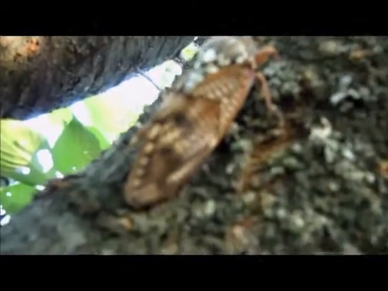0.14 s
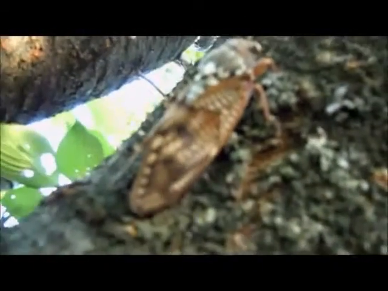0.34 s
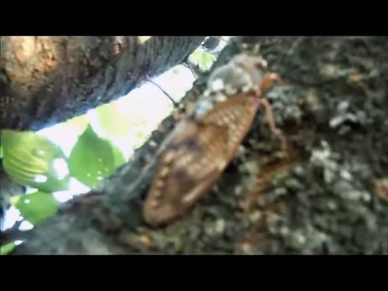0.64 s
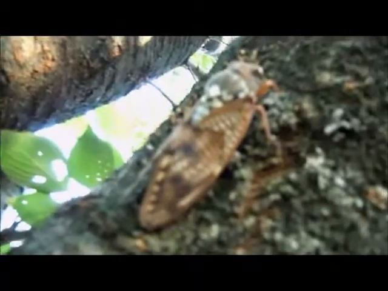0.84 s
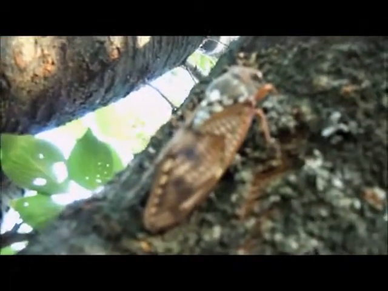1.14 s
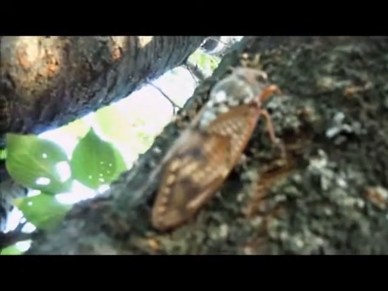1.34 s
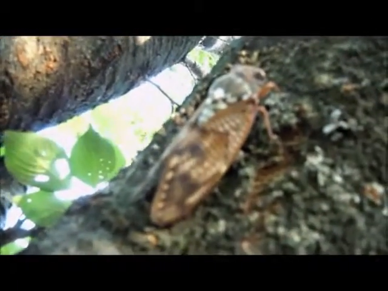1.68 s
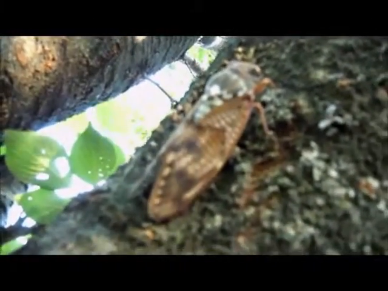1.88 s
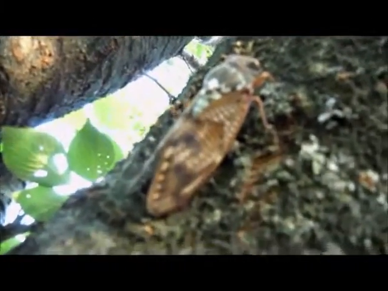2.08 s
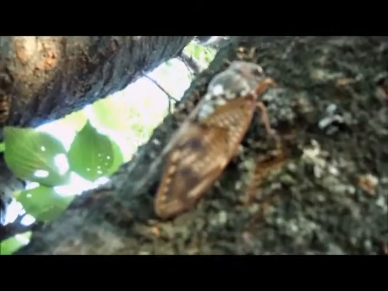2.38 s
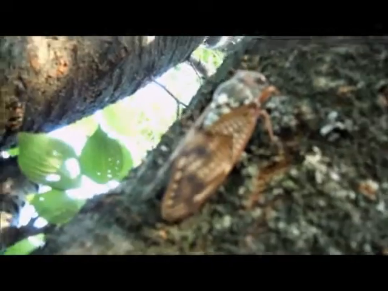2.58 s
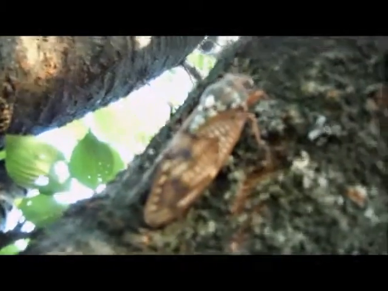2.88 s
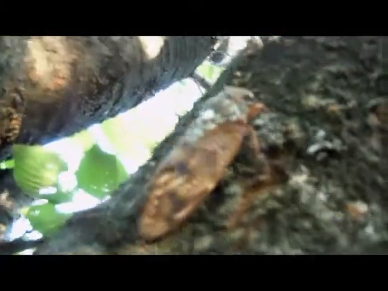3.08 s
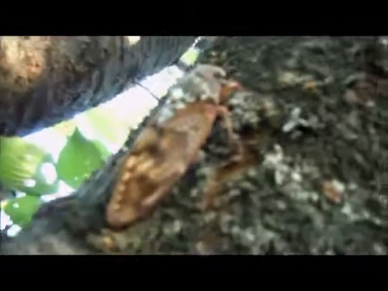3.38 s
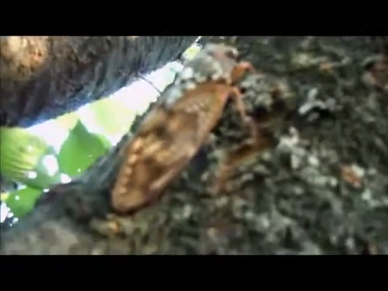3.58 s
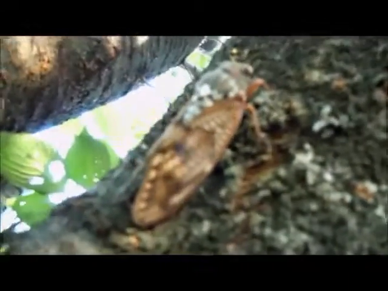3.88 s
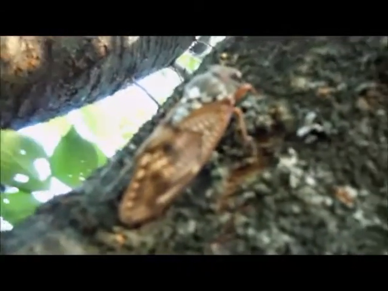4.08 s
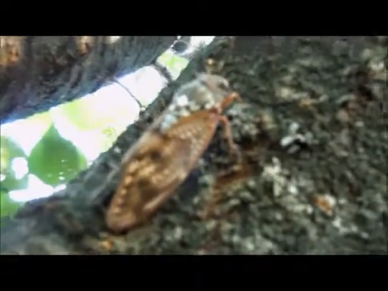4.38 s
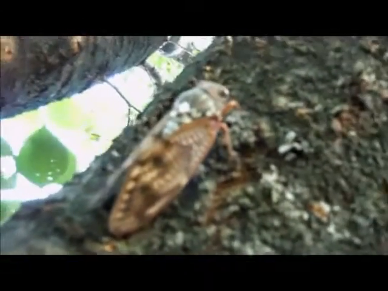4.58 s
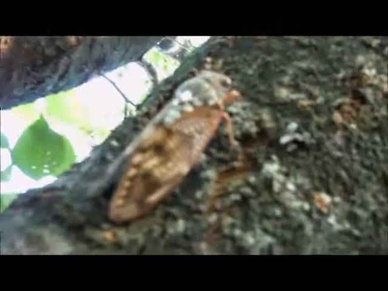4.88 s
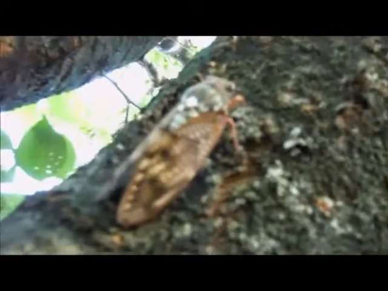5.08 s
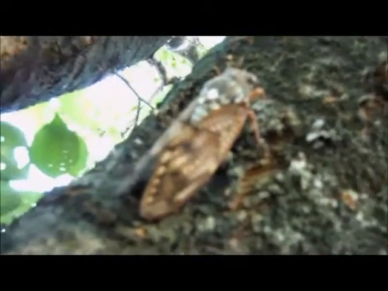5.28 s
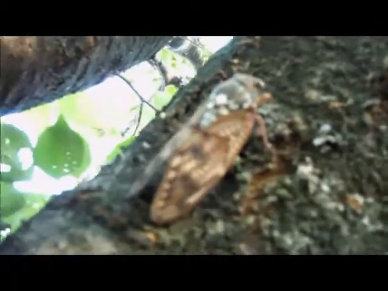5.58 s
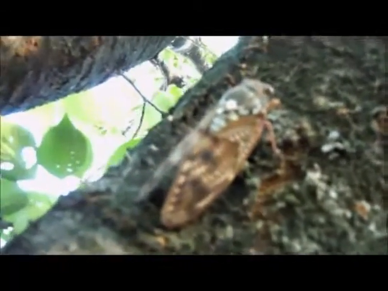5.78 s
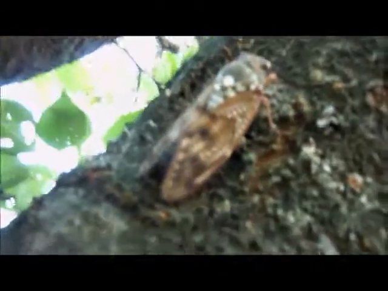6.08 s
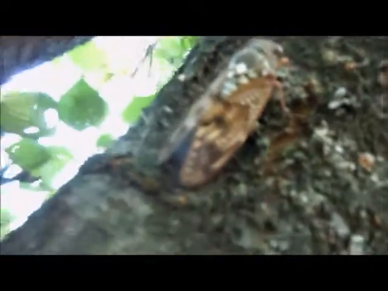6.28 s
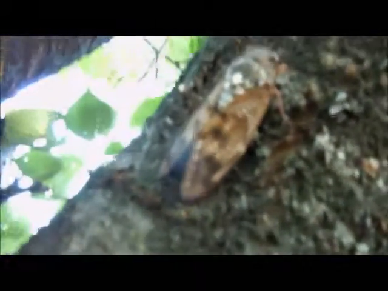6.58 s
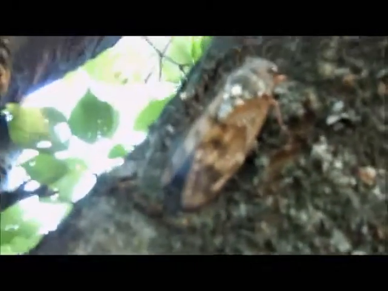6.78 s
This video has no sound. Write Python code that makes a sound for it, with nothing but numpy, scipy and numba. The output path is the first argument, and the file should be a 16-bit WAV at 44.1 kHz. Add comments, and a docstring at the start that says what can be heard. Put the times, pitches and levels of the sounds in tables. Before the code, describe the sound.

Outdoors among trees, a nearby cicada's raspy electric-sounding buzz dominates throughout, slightly towards the right. It drops in pitch and weakens, then suddenly turns brighter and stronger. Behind it are regular short rasping swells from a second cicada and a wide sizzling insect chorus. Soft road noise sits low underneath, with a few tiny casing ticks midway, a low vehicle hum later, and growing wind thumps on the microphone.

```python
"""A cicada on a tree trunk buzzes close to a small camera: click trains excite a body resonance that sinks,
then leaps up near 2.2 s and holds. From the start a neighbour swells twice a second over a chorus of
filtered random grains, a road murmurs as shaped noise, and low noise gusts as wind on the microphones.
Ringing casing ticks come near 2.9, 4.0 and 4.4 s; from 4.2 s an engine drones past as a sum of harmonics,
and the wind is strongest at the end."""
import sys
import numpy as np
from scipy import signal
from scipy.fft import rfft, irfft
from scipy.io import wavfile
from scipy.ndimage import uniform_filter1d
from numba import njit

SR = 44100
rng = np.random.default_rng(int(sys.argv[2]) if len(sys.argv) > 2 else 0)


def volts_from_db(level):
    """Convert decibel levels to linear amplitude ratios."""
    exponent = np.asarray(level, float) / 20
    return 10 ** exponent


def bounce(signal):
    """Save signal as a 16-bit WAV file at the path given by the first command-line argument."""
    frames = np.transpose(np.atleast_2d(signal))
    limited = np.clip(frames, -1, 1)
    pcm = np.round(limited * 32767).astype(np.int16)
    wavfile.write(sys.argv[1], SR, pcm)


N = 306054
T = np.arange(N) / SR
OPPOSED = np.array([[1], [-1]])  # signs of a difference signal in left and right


def unit(x):
    """Normalization by the root mean square: the result has rms 1."""
    return x / np.sqrt(np.mean(x ** 2))


def curves(rows):
    """Linear interpolation in time of each column after the first."""
    s, *columns = np.transpose(rows)
    return [np.interp(T, s, c) for c in columns]


@njit
def svf(x, hz, width):
    """State-variable resonator: a band-pass with moving centre and width [Hz], gain 1 at the centre."""
    y, b, l = np.empty(len(x)), 0., 0.
    for i in range(len(x)):
        g, k = np.tan(np.pi * hz[i] / SR), width[i] / hz[i]
        v = (b + g * (x[i] - l)) / (1 + g * (g + k))
        b, l, y[i] = 2 * v - b, l + 2 * g * v, k * v
    return y


def band(x, hz, width_hz):
    """Cascaded resonance: the same band-pass twice steepens the flanks."""
    hz, width_hz = hz + np.zeros(N), width_hz + np.zeros(N)
    return svf(svf(x, hz, width_hz), hz, width_hz)


def colour(x, tone):
    """Spectral shaping: multiplies the spectrum by a curve through (frequency [Hz], gain [dB]) points."""
    hz, db = np.transpose(tone)
    f = np.arange(N // 2 + 1) * SR / N + 1
    gain_db = np.interp(np.log(f), np.log(hz), db)
    return irfft(rfft(x) * volts_from_db(gain_db), N)


def walk(changes, size):
    """Slow random modulation of rms 1: held random levels, smoothed twice down each column."""
    k = max(int(size[0] / changes), 1)
    steps = np.repeat(rng.standard_normal((size[0] // k + 1, size[1])), k, axis=0)
    smooth = uniform_filter1d(uniform_filter1d(steps, k, axis=0), k, axis=0)
    return unit(smooth[:size[0]])


def drift(changes):
    """Slow random modulation of rms 1, one value a sample."""
    return walk(changes, (N, 1))[:, 0]


def clicks(times, sizes):
    """Band-limited impulses: each click is a short windowed sinc, placed between samples."""
    at = np.clip(times * SR, 8, N - 9)
    index = at.astype(int)[:, None] + np.arange(-7, 9)
    lag = index - at[:, None]
    pulse = np.sinc(lag) * np.cos(np.pi * lag / 16) ** 2
    out = np.zeros(N)
    np.add.at(out, index, sizes[:, None] * pulse)
    return out


def tymbal(hz, ribs, pattern_us, chance_us, pattern_db, chance_db, changes):
    """Rib buckling: click timing and size repeat every muscle cycle, change slowly and scatter by chance."""
    phase = np.cumsum(hz) / SR
    cycles = int(phase[-1] / ribs)
    even = np.interp(np.arange(cycles * ribs), phase, T)
    pattern = walk(changes, (cycles, 2 * ribs))
    late_chance, size_chance = rng.standard_normal((cycles * ribs, 2)).T
    late_us = np.interp(even, T, pattern_us) * pattern[:, :ribs].ravel()
    late_us = late_us + np.interp(even, T, chance_us) * late_chance
    size_db = pattern_db * pattern[:, ribs:].ravel() + chance_db * size_chance
    return clicks(even + late_us / 1e6, volts_from_db(size_db))


def smear(x, spread_ms, share):
    """All-pass dispersion: ribs buckling in turn spread each click into a burst that keeps its colour."""
    for part in (.17, .31, .53, .79, 1.0):
        taps = np.zeros(max(int(part * spread_ms * SR / 1000), 1) + 1)
        taps[0], taps[-1] = 1, -np.clip(share, 0, .9)
        x = signal.lfilter(taps[::-1], taps, x)
    return x


def scatter(x, t60, changes):
    """Multiple scattering: ragged echoes decay 60 dB in t60 [s]; three bursts trade shares, so colour drifts."""
    t = np.arange(1, SR // 8) / SR
    bursts = rng.standard_normal((3, len(t))) * np.exp(-np.log(1000) * t / t60)
    bursts = bursts / np.sqrt((bursts ** 2).sum(1, keepdims=True))
    echoes = signal.fftconvolve(x[None], bursts, axes=1)[:, :N]
    shares = walk(changes, (N // 100 + 1, 3)).repeat(100, axis=0)[:N].T
    return (echoes * shares).sum(0) / np.sqrt((shares ** 2).sum(0))


def place(x, pan_db, shared_db, apart_db, t60):
    """Level-difference panning: direct sound with bark and leaf echoes, shared by both ears or opposed."""
    mid = x + volts_from_db(shared_db) * scatter(x, t60, changes=40)
    side = volts_from_db(apart_db) * scatter(x, t60, changes=30)
    return (mid + side * OPPOSED) * volts_from_db(np.array([pan_db, -pan_db]) / 2)


def spread(make, likeness):
    """Partial coherence: two independent draws mixed into channels whose correlation is likeness."""
    likeness = np.clip(likeness, 0, 1)
    mid = np.sqrt(1 + likeness) * make()
    side = np.sqrt(1 - likeness) * make()
    return (mid + side * OPPOSED) / np.sqrt(2)


def bumps(times, peaks_db, lengths, base_db):
    """Incoherent addition: powers of a base and of bell-shaped rises add; lengths [s] are 1/e of amplitude."""
    power = volts_from_db(base_db) ** 2
    for s, db, w in zip(times, peaks_db, lengths):
        power = power + (volts_from_db(db) * np.exp(-((T - s) / w) ** 2)) ** 2
    return np.sqrt(power)


def singer():
    """Forced resonance: six clicks a muscle cycle ring two coupled body modes, their level held even."""
    # singer's posture: (time [s], click rate [Hz], body resonance [Hz], chance unevenness [microseconds])
    posture = [(0, 548, 7550, 22), (.8, 569.6, 6950, 22.3), (.84, 589.4, 6980, 17), (1.42, 590.6, 6570, 20),
               (1.46, 506.5, 6400, 19), (2.05, 512.4, 6350, 17), (2.15, 516.6, 6700, 30),
               (2.2, 507.2, 8330, 11), (2.32, 503, 8610, 9), (2.9, 483.5, 8540, 8.2),
               (3.35, 480.6, 8720, 7), (3.8, 471.6, 8585, 9), (4.25, 470, 8715, 7.74),
               (4.45, 469.5, 8475, 18.6), (4.8, 464, 8490, 20.5), (5.25, 471.3, 8570, 20.4),
               (6.15, 472.1, 8456, 17.5), (6.94, 480.7, 8423, 10.1)]
    # singer as heard: (time [s], level [dB])
    heard = [(0, -21), (.74, -27.5), (.93, -23.5), (1.34, -26.5), (2.0, -24), (2.12, -26.5), (2.23, -18),
             (2.5, -18), (3.44, -19.5), (3.6, -21), (4.01, -19.5), (4.25, -23), (4.54, -20.5), (4.77, -22),
             (4.9, -20), (5.29, -19.5), (6.11, -20), (6.37, -22), (6.85, -22), (6.94, -17.5)]
    # phases of the song, each held until the next:
    # (start [s], resonance width [Hz], repeating unevenness [microseconds])
    phases = [(0, 2010, 10), (.82, 1450, 14), (2.09, 1710, 26), (2.3, 1738, 38), (4.45, 1510, 26.5)]
    # brief dips of the song: (time [s], depth [dB])
    dips = [(2.27, 2), (2.97, 3), (3.47, 3.5)]
    # singer's bearing: (time [s], left minus right [dB])
    bearing = [(0, -5), (2.7, -3.5), (3.2, -7), (4.7, -4.5), (5.8, -6), (6.94, -2.5)]
    blend_s, dip_s = .06, .023

    hz, body_hz, chance_us = curves(posture)
    start, *held = np.transpose(phases)
    now = np.searchsorted(start[1:], T)
    width_hz, pattern_us = (uniform_filter1d(c[now], int(blend_s * SR) + 1) for c in held)
    level_db = curves(heard)[0] - sum(db * np.exp(-((T - s) / dip_s) ** 2) for s, db in dips)
    # the rougher the song, the more its tempo wavers
    hz = hz * (1 + chance_us / 9000 * drift(250))
    train = tymbal(hz, ribs=6, pattern_us=pattern_us, chance_us=chance_us,
                   pattern_db=1.5, chance_db=1.5, changes=12)
    train = smear(train, spread_ms=1.0, share=.53)
    lower = band(train, body_hz - .25 * width_hz, width_hz)
    upper = band(train, body_hz + .25 * width_hz, width_hz)
    ring = band(lower - upper, body_hz, 5.2 * width_hz)
    running_rms = np.sqrt(uniform_filter1d(ring ** 2, SR // 20))
    ring = ring * volts_from_db(level_db) / running_rms
    return place(ring, curves(bearing)[0], shared_db=-9, apart_db=-6, t60=.04)


def neighbour():
    """Swept resonance: three clicks a cycle ring a climbing body mode; each swell grows, holds, stops short."""
    # neighbour's swells: (time of the peak [s], level [dB])
    swells = [(0.1064, -22.5), (0.6214, -23.5), (1.0704, -23), (1.5556, -22.5), (2.0504, -22.5),
              (2.5694, -23.5), (3.0664, -23), (3.5504, -22.5), (4.0833, -23.5), (4.6366, -26),
              (5.1714, -23), (5.7315, -23.5), (6.306, -23), (6.8525, -24)]
    rise_s, strong_db, rise_s_per_db = .021, -22.5, .003  # a weaker swell grows more slowly

    effort, climb = np.zeros(N), np.zeros(N)
    for s, db in swells:
        rise = max(rise_s + rise_s_per_db * (strong_db - db), .01)
        after_end = T - s - .012
        growth = np.exp(np.minimum(after_end + .02, 0) / rise)
        stop = np.exp(-np.maximum(after_end, 0) / .003)
        effort += volts_from_db(db) * growth * stop
        climb += np.clip(1 + after_end / .07, 0, 1) * (after_end < .03)
    flat = np.ones(N)
    train = tymbal(500 * (1 + .01 * drift(30)), ribs=3, pattern_us=120 * flat, chance_us=20 * flat,
                   pattern_db=1.5, chance_db=1.3, changes=6)
    train = smear(train, spread_ms=.5, share=.3)
    body = unit(band(band(train, 4850 + 1850 * climb, 1800), 6100, 6200))
    rasp = unit(band(train, 11200, 9100))
    call = effort * (body + volts_from_db(-3.5) * rasp)
    return place(call, .3 * flat, shared_db=-4.5, apart_db=-7, t60=.034)


def chorus():
    """Incoherent superposition: many farther cicadas as flickering random grains, widest in the top treble."""
    # colour of the chorus: (frequency [Hz], relative density [dB per Hz])
    chorus_tone = [(3000, -35), (3900, -20), (4400, -7), (5300, 0.5), (6300, 3.5), (7300, 2.5),
                   (9500, -3.5), (11000, -3.5), (12500, -3.5), (14000, -5.5)]
    start_db, fade_db_per_s, sway_db = -23.5, .26, .7

    def crowd():
        grains = rng.standard_normal(N) * volts_from_db(3.5 * rng.standard_normal(N))  # unequal sizes roughen it
        return unit(colour(grains, chorus_tone)) * volts_from_db(1.4 * drift(120))
    mid = crowd()
    side = colour(crowd(), [(3000, -9), (6000, -11), (8000, -7), (11000, -4.5)])
    return (mid + side * OPPOSED) * volts_from_db(start_db - fade_db_per_s * T + sway_db * drift(40.04))


def road():
    """Filtered-noise radiation: distant traffic, alike in both ears; passes swell murmur and tyre hiss."""
    # colour of the road: (frequency [Hz], relative density [dB per Hz])
    road_tone = [(30, 1), (60, 3), (120, -6), (260, -0.5), (500, -6.5), (800, -10.5), (1600, -22.5),
                 (2600, -17.5), (4000, -21), (6000, -25.5)]
    # passing vehicles: (time nearest [s], tyre hiss [dB], murmur [dB], time to fade to a third [s])
    passes = [(0, -43.5, -47, 0.18), (.7, -41.5, -42, 0.56), (1.64, -49, -42.5, 0.38),
              (3.4, -55.5, -50.5, 0.16), (3.97, -44, -43.5, 0.17), (4.4, -49, -56, 0.54),
              (5.45, -40, -36, 0.31), (6.1, -47.5, -38, 0.61), (6.5, -49, -63, 0.16)]
    # a soft moan swells within the traffic: (time [s], peak [dB], time to fade to a third [s])
    moans = [(1.9, -51, 0.51), (4.95, -48, .25), (6.05, -48, 0.17)]
    murmur_base_db, hiss_base_db = -41.5, -52.5
    s, hiss_db, murmur_db, fade_s = np.transpose(passes)

    def traffic():
        murmur = unit(colour(rng.standard_normal(N), road_tone))
        moan = unit(band(rng.standard_normal(N), 550, 110))
        hiss = unit(band(rng.standard_normal(N), 1070, 920))
        murmur = murmur * bumps(s, murmur_db, fade_s, murmur_base_db)
        moan = moan * bumps(*np.transpose(moans), -80)
        return murmur + moan + hiss * bumps(s, hiss_db, fade_s, hiss_base_db)
    return spread(traffic, .88)


def wind():
    """Turbulent pressure: low-frequency noise buffets the two microphone ports, only partly alike."""
    # gusts on the ports: (time [s], peak [dB], time to fade to a third [s])
    gusts = [(0, -41, .12), (.39, -38, 0.066), (.6, -35, .1), (3.83, -46, .1), (5.28, -44, 0.082),
             (5.62, -45, .12), (6.08, -41, 0.077), (6.3, -32.5, 0.076), (6.58, -29.5, 0.072),
             (6.8, -34.5, 0.13), (6.94, -24, 0.064)]
    breeze_db, breeze_sway_db = -53, 5

    def buffet():
        tone = [(12, -27), (25, -5), (60, -2), (130, -7.0), (250, -17.5), (600, -35)]
        return unit(colour(rng.standard_normal(N), tone))
    ports = spread(buffet, .3)
    return ports * bumps(*np.transpose(gusts), breeze_db + breeze_sway_db * drift(51.3))


def ticks():
    """Impulse response: tiny knocks of the casing ring a damped resonance with a short scraped tail."""
    # small ticks of the casing: (time [s], click gain before the filters [dB], ring [Hz])
    casing_ticks = [(2.876, -10, 2220), (2.885, -1, 2700), (2.8986, -4, 2210), (3.9538, -3, 2030),
                    (3.9646, -8, 1803), (4.4432, -9, 2330)]
    knocks = sum(volts_from_db(db) * band(clicks(np.array([s]), np.ones(1)), hz, 1300) for s, db, hz in casing_ticks)
    knocks = knocks + 1.5 * scatter(knocks, .035, changes=7)
    return band(knocks, 2300, 3200) * volts_from_db(np.array([[-2.], [2.]]))


def engine():
    """Harmonic synthesis: sines at multiples of the firing rate, heard only while the vehicle is near."""
    # engine: (time [s], firing rate [Hz], gain of all tones [dB], extra gain of the lowest tone [dB])
    drive = [(4.6, 53.9, -43, -12), (4.9, 54.03, -40, -7), (5.08, 53.9, -38, 1), (5.35, 56.86, -36, 0.4),
             (5.54, 55.9, -36.5, 1.5), (5.8, 53.64, -36.5, -2.5), (6.2, 53.42, -36, -6),
             (6.5, 53.63, -39, -10)]
    # harmonics: (multiple of the firing rate, relative gain [dB])
    orders = [(1, 3.5), (2, -3.5), (3, -11.5), (4, -10), (5, -11)]

    hz, level_db, lowest_db = curves(drive)
    first, last = drive[0][0], drive[-1][0]
    near = np.interp(T, [first - .4, first, last, last + .26], [0, 1, 1, 0])
    turn = 2 * np.pi * np.cumsum(hz) / SR + np.array([[0], [.5]])  # it reaches one port a little earlier
    drone = 0
    for k, db in orders:
        tone_db = db + (k == 1) * lowest_db + 1.2 * drift(40)
        drone = drone + volts_from_db(tone_db) * np.sin(k * turn + k * k)
    return np.sqrt(2) * drone * near * volts_from_db(level_db + np.array([[-1.2], [1.2]]))


def scene():
    """Linear superposition of all sources."""
    return singer() + neighbour() + chorus() + road() + wind() + ticks() + engine()


def narrow(x, keep_db, bass_hz):
    """Mid/side gating: outside wide spells, only bass and bands with a strong side keep their width."""
    # spells in which the full stereo width is heard: (start [s], end [s])
    wide_spells = [(.082, 0.19), (.54, 0.65), (.698, .874), (.911, 1.13), (1.194, 1.36), (1.622, 1.72),
                   (1.941, 2.1), (2.631, 2.76), (2.917, 3.012), (3.144, 3.245), (3.421, 3.52),
                   (4.582, 4.89), (5.745, 5.93), (6.745, 6.96)]
    mid, side = (x[0] + x[1]) / 2, (x[0] - x[1]) / 2
    frames = dict(fs=SR, window="cosine", nperseg=2048, noverlap=1024)
    hz, _, m = signal.stft(mid, **frames)
    d = signal.stft(side, **frames)[2]

    def power(z):
        sums = np.add.reduceat(abs(z) ** 2, np.arange(0, len(hz), 12))  # bands of 12 bins
        return uniform_filter1d(sums, 3).repeat(12, axis=0)[:len(hz)]
    floor = np.median(power(m).max(0)) * volts_from_db(-23) ** 2
    strong = power(d) > volts_from_db(keep_db) ** 2 * power(m) + floor
    # the bass edge is patchy in time and frequency
    patches = walk(110, (m.shape[1], len(hz) // 8 + 1)).T.repeat(8, axis=0)[:len(hz)]
    bass = hz[:, None] < bass_hz * volts_from_db(5.0 * patches)
    kept = signal.istft(d * (strong | bass), **frames)[1][:N]
    wide = sum(np.clip(np.minimum(T - a, b - T) / .043, 0, 1) for a, b in wide_spells)
    side = wide * side + (1 - wide) * kept
    return np.array([mid + side, mid - side])


def roll_off(x):
    """The treble ends steeply here."""
    return signal.sosfilt(signal.butter(12, 15430, fs=SR, output="sos"), x)


def record(dry):
    """Band limiting: a steep elliptic low-pass cuts the top, then the stereo image is narrowed."""
    low_pass = signal.ellip(12, .2, 100, 14250, fs=SR, output="sos")
    mix = narrow(signal.sosfilt(low_pass, dry), keep_db=-3.5, bass_hz=420)
    return roll_off(mix)


dry = scene()
out = record(dry)
bounce(out)
```